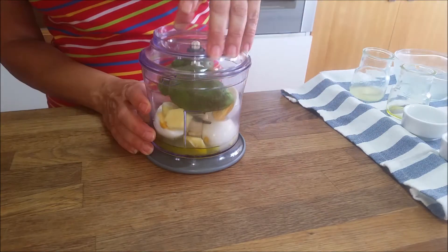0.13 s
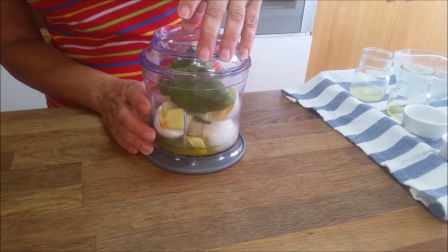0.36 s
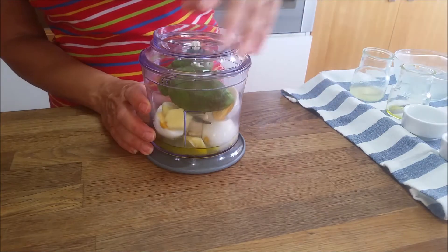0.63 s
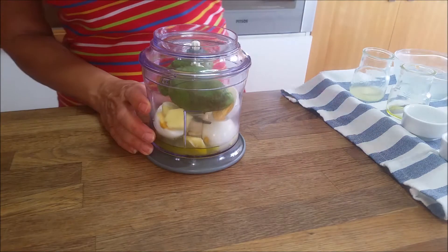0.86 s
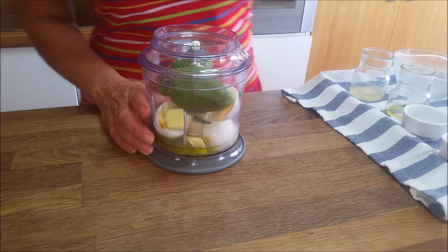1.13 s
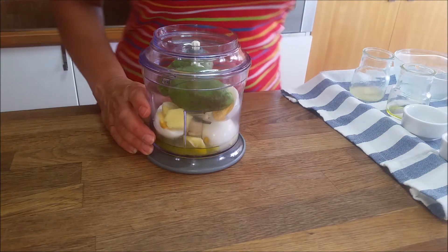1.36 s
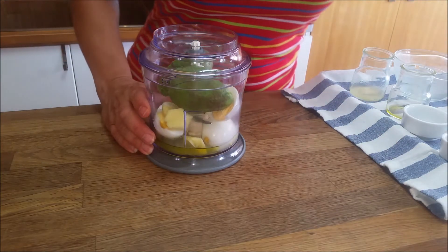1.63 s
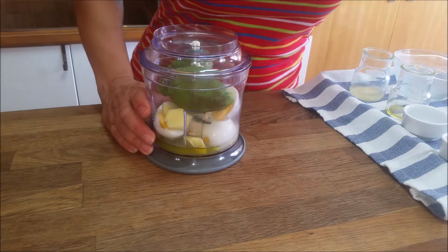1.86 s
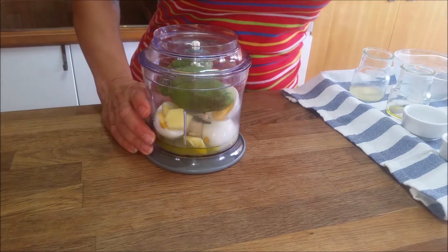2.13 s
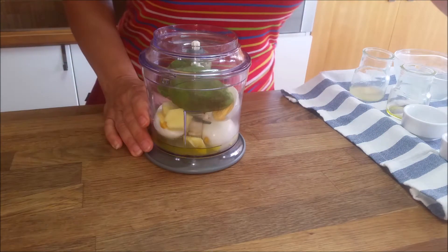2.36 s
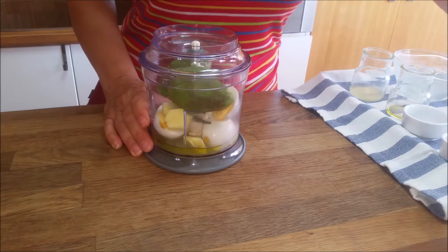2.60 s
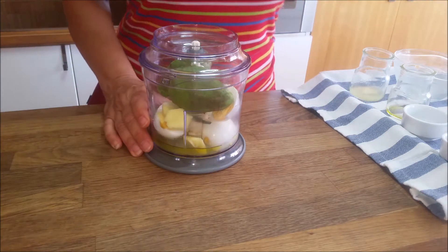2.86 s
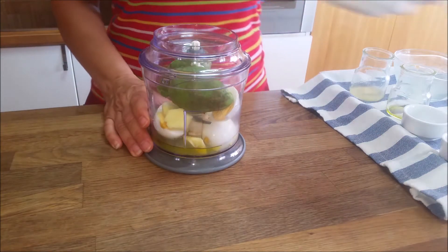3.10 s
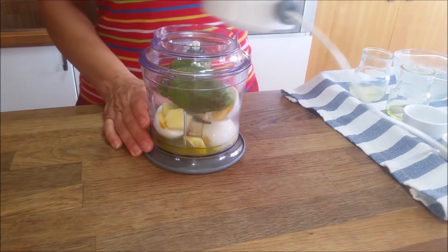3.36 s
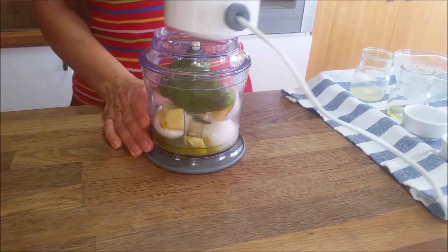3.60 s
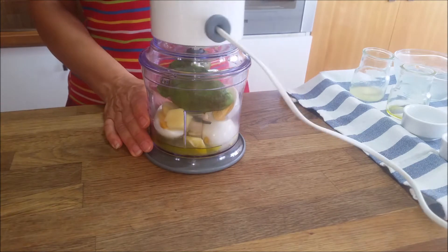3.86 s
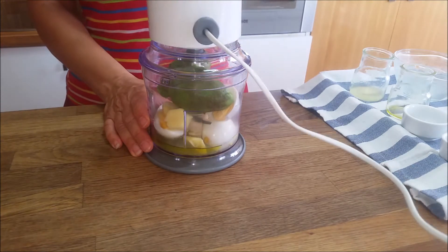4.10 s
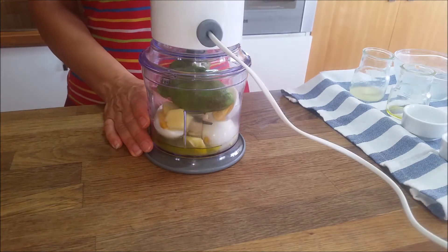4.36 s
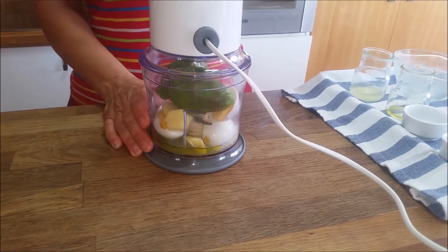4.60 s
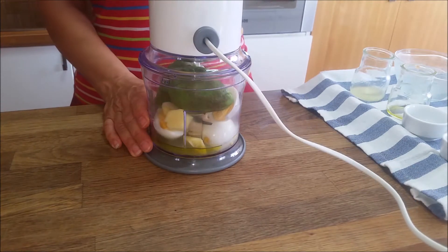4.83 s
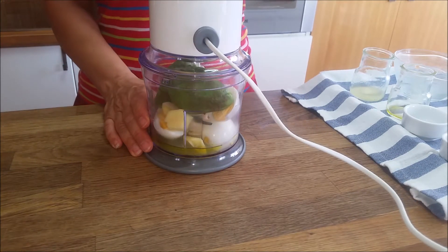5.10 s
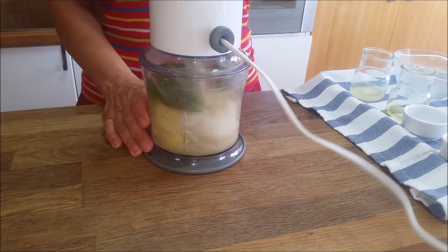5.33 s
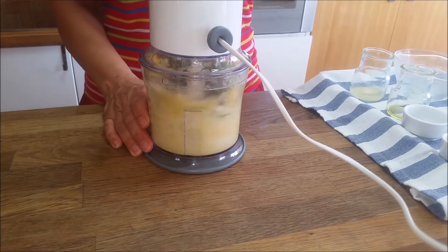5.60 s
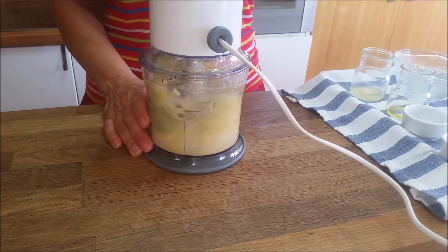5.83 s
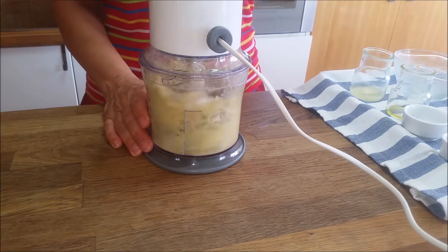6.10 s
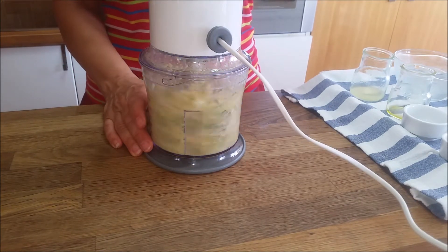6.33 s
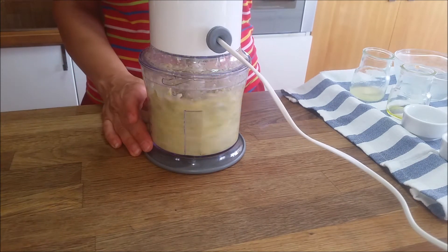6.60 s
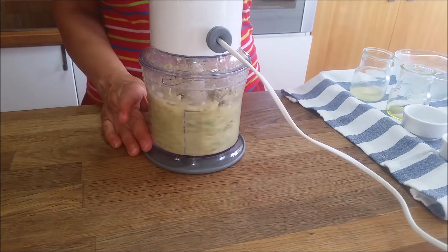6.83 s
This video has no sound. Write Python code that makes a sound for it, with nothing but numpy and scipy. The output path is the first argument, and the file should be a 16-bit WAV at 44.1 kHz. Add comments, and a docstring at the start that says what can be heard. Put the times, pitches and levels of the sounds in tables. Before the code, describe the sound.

In a quiet kitchen, plastic parts knock and snap together before a small electric chopper roars, whining and rattling, then fades.

```python
"""A tiled kitchen with a wooden worktop, where a fridge hums under room tone and microphone hiss.
The plastic lid and motor unit of a small food chopper knock into place: impulses excite damped modes.
Then its geared motor runs up and whines in multiples of the shaft speed, while random blows of food
excite bowl and worktop. The sound is cut once and fades in again; the motor fades towards the end."""
import sys
import numpy as np
from scipy import signal
from scipy.fft import rfft, irfft, next_fast_len
from scipy.io import wavfile
from scipy.ndimage import map_coordinates

SR = 44100
rng = np.random.default_rng(int(sys.argv[2]) if len(sys.argv) > 2 else 0)


def unload_wav(signal):
    """Save mono or channel-first audio to the path in sys.argv[1] as 16-bit WAV at rate SR, clipped to [-1, 1]."""
    wavfile.write(
        sys.argv[1],
        SR,
        np.round(np.clip(np.atleast_2d(signal).T, -1, 1) * 32767).astype(np.int16),
    )


def volts_from_db(level):
    """Convert decibel levels to linear amplitude ratios."""
    exponent = np.asarray(level, float) / 20
    return 10 ** exponent


N = 306936
T = np.arange(N) / SR
EAR = np.array([[.5], [-.5]])  # shares a left-right difference between the two channels
CUT_S = 2.238
MAINS_HZ = 50


def unit(x):
    """Normalization: scale to rms 1."""
    return x / np.sqrt(np.mean(x ** 2) + 1e-20)


def along(points, hz):
    """Interpolation of (f/Hz, value) points on a logarithmic frequency axis."""
    f, v = np.transpose(points)
    return np.interp(np.log(hz + 1), np.log(f + 1), v)


def curves(rows):
    """Linear interpolation in time: one value per sample for each column after the time."""
    s, *columns = np.transpose(rows)
    return [np.interp(T, s, column) for column in columns]


def wobble(rate):
    """Slow random modulation: a smooth curve through rate random knots a second."""
    knots = rng.standard_normal(int(N * rate / SR) + 4)
    return map_coordinates(knots, [T * rate])


def chatter(rate, spread_db):
    """Shot noise: two unrelated trains of random blows, rate a second."""
    hits = rng.random((2, N)) < rate / SR
    return hits * rng.standard_normal((2, N)) * volts_from_db(spread_db * rng.standard_normal((2, N)))


def filtered(x, response):
    """Linear filtering: multiply the spectrum by a complex response of frequency."""
    m = next_fast_len(N + SR)
    return irfft(rfft(x, m) * response(np.fft.rfftfreq(m, 1 / SR)), m)[..., :N]


def resonances(modes):
    """Modal superposition: causal response of broad (f/Hz, width/Hz, level/dB) modes, alternating in sign."""
    def response(f):
        total = 0
        for k, (centre, width, db) in enumerate(modes):
            bandpass = 1j * f * width / (centre * centre - f * f + 1j * f * width)
            total = total + (-1) ** k * volts_from_db(db) * bandpass
        return total
    return response


def spread(pair, spectrum, alike, balance=((100, 0),)):
    """Interchannel coherence: colour two unrelated signals and mix them to a stereo pair of rms 1."""
    def mid_side(hz):
        angle = np.arccos(np.clip(along(alike, hz), -1, 1)) / 2
        return volts_from_db(along(spectrum, hz)) * [np.cos(angle), np.sin(angle)]

    mid, side = filtered(pair, mid_side)
    stereo = np.array([mid + side, mid - side])
    return unit(filtered(stereo, lambda hz: volts_from_db(np.outer([.5, -.5], along(balance, hz)))))


def ring(modes):
    """Modal decay: stereo impulse response of a struck object."""
    t = T[:SR // 2]
    total = 0
    for hz, db, t60, pan_db, lead in modes:
        decay = volts_from_db(db + EAR * pan_db - 60 * t / t60)
        onset = 1 - np.exp(-t * hz * 2)
        total = total + decay * np.sin(2 * np.pi * hz * t + EAR * lead) * onset
    return total


def strike(force, modes):
    """Convolution: the object's answer to a force."""
    return signal.fftconvolve(force[None], ring(modes), axes=1)[:, :N]


# reverberation of the tiled kitchen: f/Hz, t60/s
REVERBERATION = [(100, 0.44), (400, 0.49), (2000, 0.42), (6000, 0.46), (14000, 0.42)]


def tails(count):
    """Diffuse reverberation: echoes build up, then each frequency dies at its own speed."""
    hz, t, z = signal.stft(rng.standard_normal((count, 2, SR // 2)), SR, nperseg=256)
    decay = volts_from_db(-60 * t / along(REVERBERATION, hz)[:, None])
    build_up = 1 - 0.17 * np.exp(-t / 0.014)
    tail = signal.istft(z * decay * build_up, SR, nperseg=256)[1]
    tail = tail / np.linalg.norm(tail[0, 0])
    return np.pad(tail, ((0, 0), (0, 0), (220, 0)))  # delay of 220 samples, about 5 ms


def room(x):
    """Room response: the kitchen's answer to a sound, by convolution."""
    return signal.fftconvolve(x.mean(0)[None], tails(count=1)[0], axes=1)[:, :N]


# coherence of diffuse noise: f/Hz, left-right likeness
DIFFUSE_ALIKE = [(60, 0.19), (240, 0.24), (950, 0.08), (3770, 0.033), (15000, 0.0076)]
# balance of diffuse noise: f/Hz, left-right level/dB
DIFFUSE_BALANCE = [(60, 0), (180, -3), (550, -5.5), (1650, -12.5), (4970, -18.5), (15000, -3)]


def diffuse(pair, spectrum):
    """Diffuse field: noise with weakly coherent channels."""
    return spread(pair, spectrum, DIFFUSE_ALIKE, DIFFUSE_BALANCE)


# spectrum of room tone and microphone hiss: f/Hz, relative density level/dB
AIR_SPECTRUM = [(15, -51), (25, -12), (166, -5.5), (206, -3.5), (263, -15.5), (394, -10.5), (439, -22),
                (796, -15.5), (2410, -38.5), (3250, -20.5), (3620, -15.5), (4250, -24), (5000, -49.5),
                (5880, -63.5), (16000, -34.5)]


def air():
    """Stationary noise: white noise shaped into room tone and microphone hiss."""
    return volts_from_db(6.5) * diffuse(rng.standard_normal((2, N)), AIR_SPECTRUM)


# fridge hum: f/Hz, relative level/dB, wavering rate/Hz, left-right level/dB, left lead/rad
FRIDGE_TONES = [(203.7, 2.5, 10, -5.5, -0.68), (230, -1.5, 14, -3.5, -1), (286, -9, 18, -1.5, -0.7),
                (580, -15, 4.5, -5, 0.031), (766, -15.5, 24, -7, -0.67)]


def fridge():
    """Narrow-band noise: tones wavering randomly in level and phase."""
    hum = 0
    for hz, db, rate, pan_db, lead in FRIDGE_TONES:
        level = volts_from_db(db + EAR * pan_db + 5.1 * wobble(rate))
        hum = hum + level * np.cos(2 * np.pi * hz * T + EAR * lead + 2.1 * wobble(rate))
    return hum


# drift of the background: t/s, relative level/dB
BACKGROUND_DRIFT = [(0.0, -57), (0.36, -60.5), (0.92, -65), (1.6, -66), (2.06, -62.5), (3.0, -65),
                    (3.69, -69), (3.84, -62.5), (4.67, -63.5), (4.87, -66), (5.33, -70)]


def background():
    """Superposition of unrelated sources: room noise and fridge, fading in again after the cut."""
    fade_length_s, fade_power = 2.62, 0.97
    rise = np.clip((T - CUT_S) / fade_length_s, 0, 1) ** fade_power
    fade_in = np.where(T < CUT_S, 1, rise)
    return fade_in * volts_from_db(curves(BACKGROUND_DRIFT)[0]) * (air() + fridge())


# cloth brushing: t/s, relative level/dB, length/s
CLOTH_STROKES = [(1.519, -64, 0.19), (2.166, -73.5, .05), (3.104, -70.5, 0.11)]
# spectrum of the cloth: f/Hz, relative density level/dB
CLOTH_SPECTRUM = [(300, -23), (500, 9), (1500, 7), (2600, -15), (6000, -25), (15000, -22)]


def rustle():
    """Friction noise: dense small blows in short soft swells of cloth against the worktop."""
    swell = 0
    for s, db, length in CLOTH_STROKES:
        u = np.clip(T - s, 0, 9) * 4 / length
        swell = swell + volts_from_db(db) * np.exp(1 - u) * u
    return swell * diffuse(chatter(5500, spread_db=3.0), CLOTH_SPECTRUM)


# modes of the worktop under the bowl: f/Hz, level/dB, t60/s, left-right level/dB, left lead/rad
WORKTOP_MODES = [(102.5, -14.5, 0.4, -8.5, 2.7), (138.8, -6, 0.2, -2, .3), (160.65, -7, 0.27, -0.5, 0.23),
                 (172.2, -0.5, 0.24, 4, .1), (226.3, -7, 0.18, -2.5, 0.46)]


def worktop(force):
    """Forced plate vibration: the worktop's modes answer a force."""
    return strike(force, WORKTOP_MODES)


# modes of the bowl walls: f/Hz, level/dB, t60/s, left-right level/dB, left lead/rad
BOWL_MODES = [(264.8, -5, 0.15, -1.5, 0.42), (303.7, 0.5, 0.083, -9.5, 1), (325, -0.2, .12, -5, 0.78),
              (356.2, -2, 0.13, -6.5, .6), (425.5, 4.5, 0.052, -9.5, 0.24),
              (470.6, -1.5, 0.092, -10.5, 0.14), (635, -7, 0.075, -6.5, 0.22), (821, -8, 0.054, -5, .4)]


def bowl(force):
    """Forced shell vibration: the bowl walls' modes answer a force."""
    return strike(force, BOWL_MODES)


# lower modes of lid and housing plastic: f/Hz, width/Hz, level/dB
PLASTIC_LOW = [(645, 203, 2), (900, 430, 1.5), (1530, 536, -1.5)]
# upper modes of lid and housing plastic: f/Hz, width/Hz, level/dB
PLASTIC_HIGH = [(2340, 664, 1.5), (3350, 371, 3), (4340, 340, -4.5)]
# treble of a snap: f/Hz, relative density level/dB
SNAP_SPECTRUM = [(2500, -44.5), (4500, 5), (6000, -4.5), (8300, -19.5), (11000, -11), (13500, -12.5),
                 (15500, -9)]


def plastic(low, high, snap):
    """Damped resonance: click bursts excite the broad lid modes, and the snap adds treble."""
    lid = filtered(low, resonances(PLASTIC_LOW)) - filtered(high, resonances(PLASTIC_HIGH))
    return lid * volts_from_db(-4 * EAR) + filtered(snap, lambda hz: volts_from_db(along(SNAP_SPECTRUM, hz)))


# contacts: t/s, then relative worktop thud level/dB, bowl knock level/dB, plastic click level/dB,
# treble snap level re click/dB
CONTACTS = [(0.0339, -30.5, -26, -26, -35), (0.0693, -32.5, -30, -40, -30), (0.079, -51, -35, -35, -32),
            (0.1531, -37, -32, -43.5, -28.5), (0.208, -42, -32.5, -45, -27.5),
            (0.2614, -30, -27, -22.5, -28), (0.2774, -37, -36, -43, -27),
            (0.3325, -31.5, -26.5, -15.5, -24.5), (0.3405, -35.5, -58, -37.5, -8.5),
            (1.7996, -52, -57, -65.5, -21.5), (1.9335, -33.5, -36, -67.5, -17),
            (1.9997, -46, -55.5, -64.5, -23), (2.4692, -69, -68.5, -81, -19.5),
            (2.6208, -68.5, -73.5, -83.5, -19), (2.9494, -68, -68, -77, -18),
            (3.6432, -39.5, -42, -35, -33.5), (3.6459, -25.5, -36.5, -54, -18), (3.914, -30, -32, -41, -26),
            (3.919, -25.5, -51, -31.5, -30.5), (3.9336, -37, -43.5, -41, -18.5),
            (4.0364, -29.5, -34, -39.5, -19), (4.0432, -43, -46, -47.5, -21),
            (4.2509, -37.5, -46, -59, -21), (4.2756, -21.5, -31.5, -40, -32.5),
            (4.3022, -51, -41.5, -47, -26), (4.5533, -35, -35.5, -26, -23), (4.567, -27.5, -39.5, -29, -18),
            (4.571, -37, -26, -17.5, -17), (4.5873, -22.5, -27.5, -32.5, -10),
            (4.6114, -43.5, -27, -25, -13), (5.0734, -41, -49, -68.5, -15), (5.332, -55, -57, -68, -17),
            (5.367, -36.5, -31.5, -39.5, -24), (5.3719, -41, -21, -36, -26),
            (5.4077, -26, -29.5, -40, -19.5), (5.5352, -22.5, -38, -31.5, -15),
            (5.548, -40, -28.5, -33, -14), (5.5666, -33, -43, -32, -13.5), (5.6093, -26.5, -27.5, -28, -11)]


def knocks():
    """Impact excitation: contacts push worktop and bowl and snap the plastic; each snap stirs the room anew."""
    thud, knock = np.zeros((2, N + SR))
    clicks = np.zeros((3, 2, N + SR))
    t = T[:2000]
    soft = t * np.exp(-t / 4e-4)
    firm = t * np.exp(-t / 2.5e-4)
    envelope = volts_from_db(-60 * t / 0.021) * (1 - np.exp(-t / 0.0004))
    bursts = rng.standard_normal((len(CONTACTS), len(t))) * envelope
    for contact, burst, tail in zip(CONTACTS, bursts, tails(count=len(CONTACTS))):
        s, thud_db, knock_db, click_db, snap_db = contact
        at = round(s * SR)
        thud[at:][:len(t)] += volts_from_db(thud_db + 5.0) * soft / soft.sum()
        knock[at:][:len(t)] += volts_from_db(knock_db + 2) * firm / firm.sum()
        heard = volts_from_db(1.5) * signal.fftconvolve(burst[None], tail, axes=1)
        heard[:, :len(t)] += burst  # direct sound over its reverberation
        # the lower lid modes fall more slowly than the click
        low_db = 0.85 * (click_db + 19) - 6.5
        gains = volts_from_db(np.array([low_db, click_db + 7.5, click_db + snap_db + 18]))
        clicks[..., at:at + heard.shape[1]] += gains[:, None, None] * heard
    low, high, snap = clicks[..., :N]
    body = worktop(thud) + bowl(knock)
    return body + volts_from_db(-7.5) * room(body) + plastic(low, high, snap)


def mains_pulse():
    """Torque ripple: torque, and so motor sound, pulses at twice the mains frequency."""
    return np.sin(2 * np.pi * 2 * MAINS_HZ * T)


# motor run: t/s, shaft speed/(turns per s), food load level on the blade/dB, gear strain level/dB
MOTOR_RUN = [(5.368, 128, -6, -7), (5.42, 156, -3.5, -5), (5.526, 220, 1.5, 2), (5.56, 235, -3, 2.5),
             (5.62, 250, -0.5, 5), (5.664, 340, 1.5, -0.5), (5.71, 393, 1.5, 0.5), (5.78, 414, -1, 3),
             (5.886, 416, 1.5, -1), (5.94, 420, -0.5, -1), (6.042, 412, -0.5, 0), (6.16, 418, 3, 0.5),
             (6.205, 386, 0, 3.5), (6.24, 381, -1.5, 6), (6.29, 398, -2.5, 2.5), (6.36, 406, -0.5, 0.5),
             (6.462, 404, -1.5, -0.5), (6.556, 421, -0.5, -1), (6.8, 412, -1.5, -5),
             (6.96, 418, -2.5, -1.5)]


def running_state():
    """Operating point: start gate, shaft speed, food load and gear strain over time."""
    gate = np.clip((T - MOTOR_RUN[0][0]) / 0.0031, 0, 1)
    return gate, *curves(MOTOR_RUN)


def drive_level(db, per_octave, per_load, per_strain):
    """Power law: a gain of db at full speed, with dB slopes per speed octave and per dB of load and strain."""
    full_hz = 418  # unloaded shaft speed
    _, shaft_hz, load_db, strain_db = running_state()
    octaves = np.log2(shaft_hz / full_hz)
    return volts_from_db(db + per_octave * octaves + per_load * load_db + per_strain * strain_db)


# coherence of motor noise: f/Hz, left-right likeness
MOTOR_COHERENCE = [(60, -1.1), (150, 0.73), (380, 0.42), (950, 0.65), (2380, 0.23), (5980, 0.14),
                   (15000, -0.13)]
# balance of motor noise: f/Hz, left-right level/dB
MOTOR_BALANCE = [(60, 31.5), (150, -4.5), (380, -9.5), (950, -7.5), (2380, -7), (5980, -2.5), (15000, 2.5)]


def motor_stereo(pair, spectrum=((100, 0),)):
    """Partial coherence: motor noise as a coloured stereo pair."""
    return spread(pair, spectrum, MOTOR_COHERENCE, MOTOR_BALANCE)


# sharp housing modes: f/Hz, width/Hz, level/dB
SHARP_MODES = [(1358, 140, 1.5), (3848, 205, 2.5), (4680, 65, -0.5)]


def sharp_housing(f):
    """Structural resonance: response of the sharp housing modes."""
    return resonances(SHARP_MODES)(f)


# brushes and cooling air: f/Hz, relative density level/dB
HISS_SPECTRUM = [(2650, -25), (4500, -5), (5180, -9), (5660, -9.5), (7610, -13.5), (8440, -22.5),
                 (9970, -15.5), (13000, -18), (14700, -17.5), (15600, -17)]


def brush_hiss():
    """Modulated broadband noise: brushes and cooling air hiss with the mains pulse."""
    sparks = rng.standard_normal((2, N)) * (1 + 0.16 * mains_pulse()) * volts_from_db(1.5 * wobble(30))
    return drive_level(-38, 7.2, 0.3, 0.05) * motor_stereo(sparks, HISS_SPECTRUM)


# broad housing modes: f/Hz, width/Hz, level/dB
HOUSING_MODES = [(1300, 420, 0.5), (2220, 500, 0.5), (3150, 330, -2.5), (3915, 350, 6), (4640, 910, -4.5),
                 (5500, 140, -11.5)]


def housing_rattle():
    """Random excitation: dense blows shake the broad housing modes."""
    shake = chatter(4000, spread_db=3.5) * (1 + 0.11 * mains_pulse()) * volts_from_db(3.0 * wobble(25))
    rattle = motor_stereo(filtered(shake, resonances(HOUSING_MODES)))
    return drive_level(-36.5, 3, 0.4, 0.05) * rattle


def gear_growl():
    """Intermittent excitation: teeth and brushes catching under gear strain ring the sharp modes in bursts."""
    catch = chatter(1500, spread_db=1.5) * volts_from_db(4.5 * wobble(40))
    growl = motor_stereo(filtered(catch, lambda f: sharp_housing(f) ** 2))
    return drive_level(-46.5, -4, -1.1, 1.1) * growl


# running bowl rocking on its rubber base: f/Hz, width/Hz, level/dB
BASE_BOUNCE = [(172, 110, 0)]
# food against the walls: f/Hz, relative density level/dB
FOOD_SPECTRUM = [(24, -62), (40, -24.5), (168, -13.5), (207, -11), (354, -12), (475, -9), (999, -22),
                 (1390, -24), (1830, -36), (2500, -22), (3250, -25.5), (5500, -120)]


def food_batter():
    """Random impacts: food batters bowl and worktop, over a hum at twice the mains frequency."""
    blows = chatter(400, spread_db=2.5) * volts_from_db(2.5 * wobble(14))
    batter = 0.65 * unit(worktop(filtered(blows[0], resonances(BASE_BOUNCE))))
    batter += 0.43 * unit(bowl(blows[1]))
    batter += 0.65 * motor_stereo(chatter(900, spread_db=0.5), FOOD_SPECTRUM)
    hum_level = volts_from_db(-14 + 5.2 * wobble(12) - 14.0 * EAR)
    hum = hum_level * np.sin(2 * np.pi * 2 * MAINS_HZ * T + 1.9 * EAR)
    return drive_level(-26.5, 1, 0.94, 0.05) * (batter + hum)


def tones(orders, turns, flutter_db, blur):
    """Order synthesis: stereo sines on multiples of the shaft, wavering in level and phase (blur/rad)."""
    total = 0
    for k, db in orders:
        level = volts_from_db(db + flutter_db * (wobble(25) + EAR * wobble(40)))
        phase = 2 * np.pi * k * turns + blur * (wobble(90) + EAR * wobble(45))
        total = total + level * np.cos(phase)
    return unit(total)


# gear and commutator tones: multiple of shaft speed, relative level/dB
MAIN_ORDERS = [(5, -4.5), (6, 0)]
# upper tones: multiple of shaft speed, relative level/dB
UPPER_ORDERS = [(10, 2.5), (11.2, -12.5), (12, -3), (12.6, -4.5), (18, -11), (24, -18)]
# purer tone: multiple of shaft speed, relative level/dB
PURE_ORDER = [(7.5, 0)]


def gear_whine():
    """Rotational harmonics: tones follow the shaft and swell when they cross a housing mode."""
    _, shaft_hz, _, _ = running_state()
    pulse = mains_pulse()
    turns = np.cumsum(shaft_hz * (1 + 0.0064 * wobble(55) + 0.0094 * pulse)) / SR
    steady_turns = np.cumsum(shaft_hz) / SR
    main = tones(MAIN_ORDERS, turns, flutter_db=3.0, blur=1.0)
    upper = tones(UPPER_ORDERS, turns, flutter_db=2.0, blur=1.0)
    pure = tones(PURE_ORDER, steady_turns, flutter_db=1.5, blur=0.23)
    whine = drive_level(-36, 22, -0.77, 0.06) * volts_from_db(-6.7 * EAR) * main
    whine += drive_level(-39, 24, 0.1, 0.4) * volts_from_db(-1.5 * EAR) * upper
    # the steep speed slope lets the purer tone show only near full speed
    whine += drive_level(-49.5, 41, -1.2, -0.7) * volts_from_db(2.4 * wobble(6) - 3 * EAR) * pure
    return filtered(whine * (1 + 0.61 * pulse), lambda f: 1 + 2.54 * sharp_housing(f))


def motor():
    """Source superposition: hiss, rattle, growl, food and whine, gated by the motor's start."""
    gate = running_state()[0]
    noises = brush_hiss() + housing_rattle() + gear_growl() + food_batter()
    return gate * (noises + gear_whine())


def scene():
    """Linear superposition: background, knocks and motor in the kitchen."""
    fade_out_s, fade_out_length_s = 5.984, 1.306
    # the cut silences what still rings
    after_cut = np.where(T < CUT_S, 1, np.clip((T - CUT_S) / 0.29, 0, 1))
    hits = (knocks() + rustle()) * after_cut
    drive = motor() * np.clip(1 - (T - fade_out_s) / fade_out_length_s, 0, 1)
    # the microphones pick up little of the hits and motor below about 80 Hz
    low_cut = signal.butter(3, 80, "high", fs=SR, output="sos")
    return background() + signal.sosfilt(low_cut, hits + drive + volts_from_db(-4.0) * room(drive))


def band_limit(x):
    """A steep low-pass at the top of the band."""
    return signal.sosfilt(signal.butter(12, 16640, fs=SR, output="sos"), x)


def record(dry):
    """Band limitation: a microphone pair whose signal ends at an upper frequency limit."""
    top_hz = 15900
    mix = filtered(dry, lambda hz: hz < top_hz)
    return band_limit(mix)


dry = scene()
out = record(dry)
unload_wav(out)
```